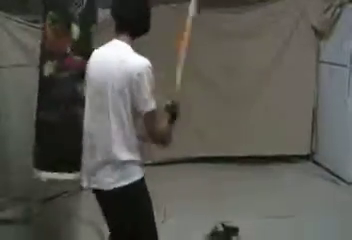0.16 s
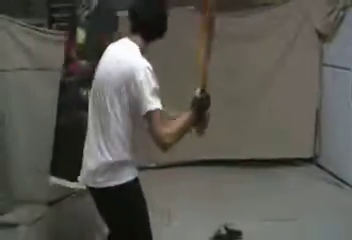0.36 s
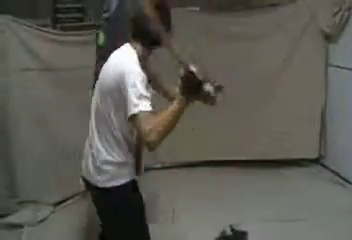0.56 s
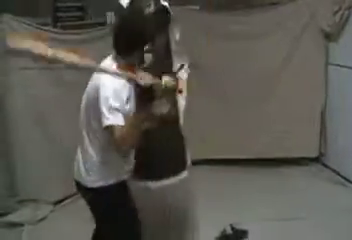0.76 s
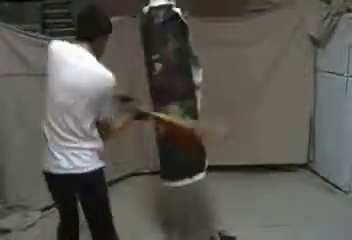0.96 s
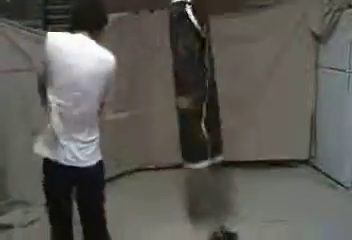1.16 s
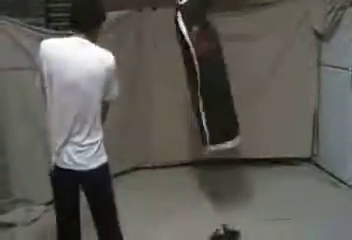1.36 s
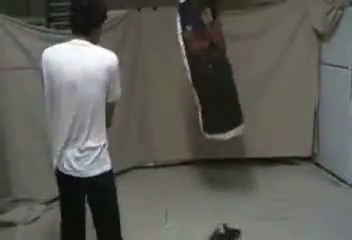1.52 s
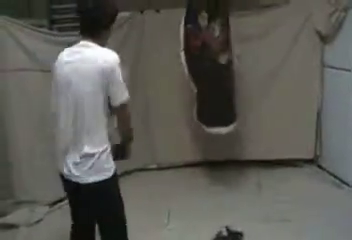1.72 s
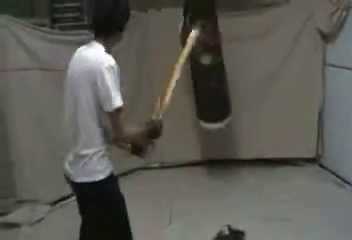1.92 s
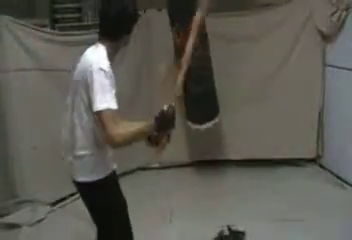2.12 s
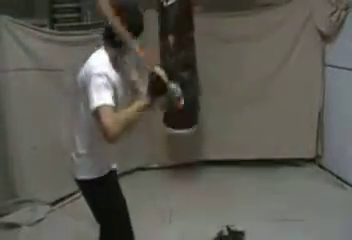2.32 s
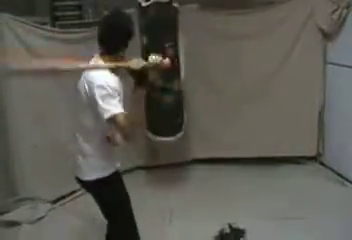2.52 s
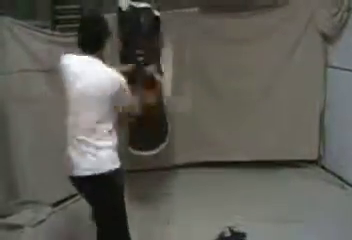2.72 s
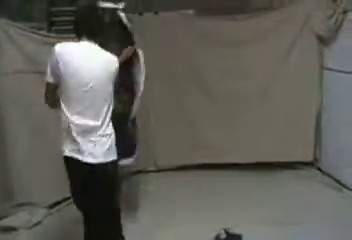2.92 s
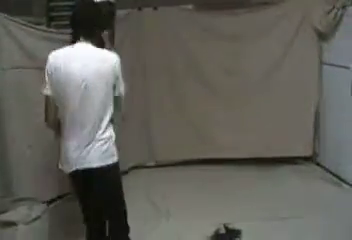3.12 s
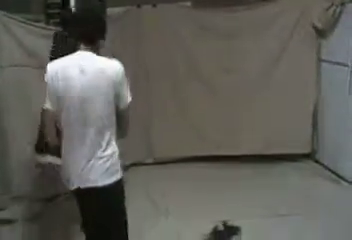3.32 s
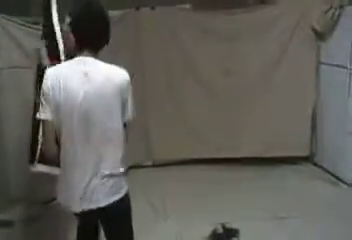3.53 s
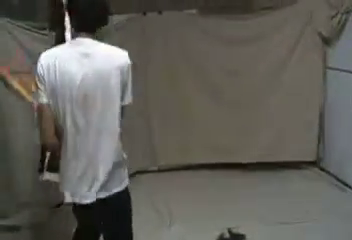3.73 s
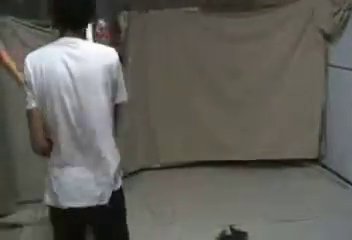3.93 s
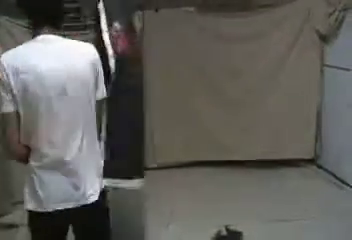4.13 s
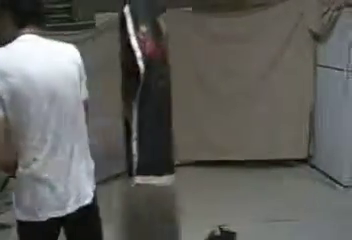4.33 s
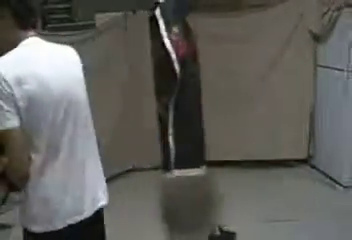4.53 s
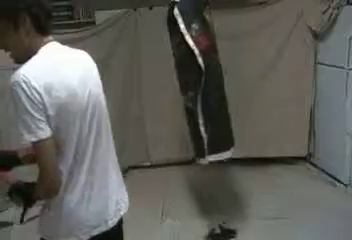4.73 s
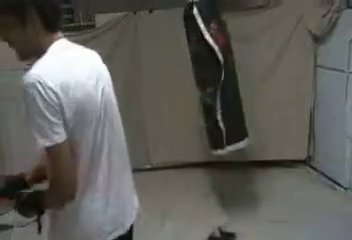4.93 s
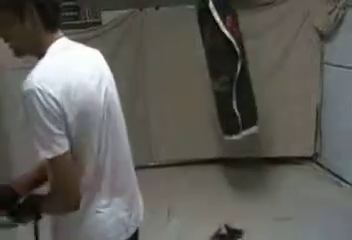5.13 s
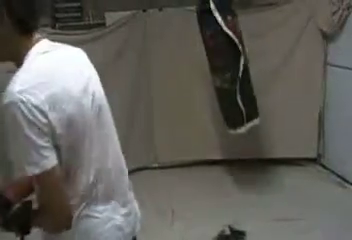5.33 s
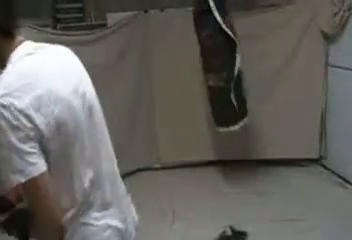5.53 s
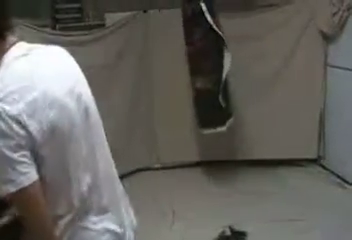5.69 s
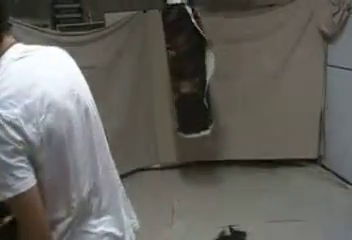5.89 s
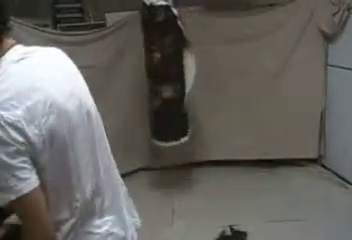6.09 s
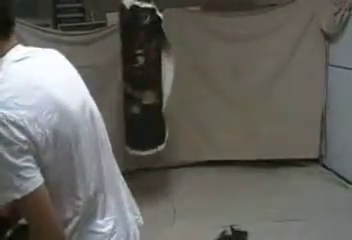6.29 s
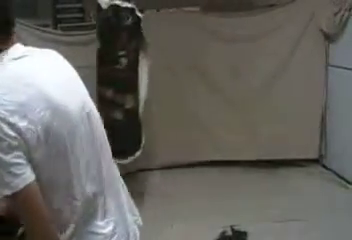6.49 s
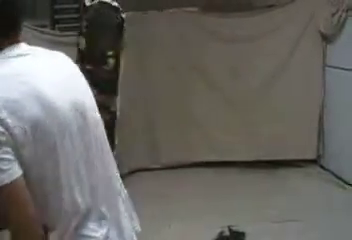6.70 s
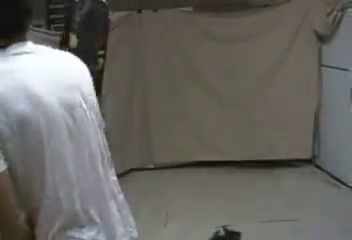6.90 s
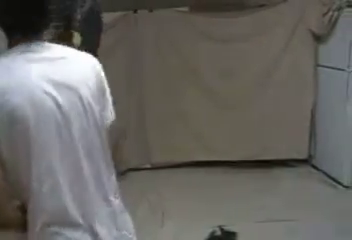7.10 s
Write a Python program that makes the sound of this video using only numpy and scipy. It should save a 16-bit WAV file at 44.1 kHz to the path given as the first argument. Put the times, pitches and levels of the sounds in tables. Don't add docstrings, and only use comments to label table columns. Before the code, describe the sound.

A small stereo microphone in a bare garage picks up a steady low motor hum near 114 Hz, soft rumble and airy hiss. It opens on the fading ring of an earlier swing, with foot taps and jolts until 0.3 s, then rustling and a faint creak. At 1.18 s a bat slams a hanging heavy bag: a very loud, clipped, slapping crack with a boomy ring, shuddering beam jolts and ducked background air. Quieter rustle and creaks follow, then a second, slightly lower whack at 2.99 s, with strong jolts around 3.2-3.4 s. Shoes scuff at about 3.6 s; a dull knock lands at 4.06 s. Small knocks cluster at 4.7-4.9 s, the hanger creaks near 5.1 s, and a hollow, woody thud with a bright click comes close by at 5.42 s. Scuffs, rustle and light taps continue from 5.9 to 6.5 s; a faint creak comes near 7 s.

```python
import sys
import numpy as np
from scipy import signal
from scipy.fft import rfft, irfft, next_fast_len
from scipy.io import wavfile
from scipy.ndimage import uniform_filter1d

SR = 44100
rng = np.random.default_rng(int(sys.argv[2]) if len(sys.argv) > 2 else 0)


def gain_from_db(level_db):
    decades = np.asarray(level_db, float) / 20
    return 10 ** decades


def master(y):
    cut = np.clip(np.atleast_2d(y).T, -1, 1)
    pcm = np.round(cut * 32767)
    wavfile.write(sys.argv[1], SR, pcm.astype(np.int16))


N = 315312
T = np.arange(N) / SR

# start in seconds, push in dB, push pitch in Hz, slap in dB,
# slap length in seconds.
BLOWS = [
    (1.1757, 15, 270, 12, .0042),
    (2.9934, 15, 205, 8, .0062),
    (5.4253, -4, 420, -24, .003),
]
# frequency in Hz, level in dB per Hz.
SLAP_COLOUR = [(500, -16), (1050, -2), (2200, 2), (3700, -1.5), (6000, -20), (10000, -7), (12000, -39)]
# dip in dB, recovery in seconds.
DUCKS = [
    (-17, 0.32),
    (-6, 0.3),
    (-7, 0.17),
]
# start in seconds, level in dB, extra dB while the cover flaps,
# flapping in seconds, pace of the fade.
SHAKES = [
    (-.05, -38.5, -2, .2, .8),
    (1.182, -21.5, 3, .17, 1.02),
    (3.002, -23.5, 5.5, .14, .86),
]
# centre in seconds, length in seconds, level in dB.
JOLTS = [(0.045, 0.078, -27.5), (.14, .12, -23), (1.29, .07, -14), (1.384, 0.07, -21), (1.52, 0.18, -17.5),
         (1.799, .1, -23), (3.208, 0.067, -14.5), (3.285, .1, -13), (3.354, 0.085, -14), (3.47, .2, -28),
         (3.64, .15, -30), (2.97, .06, -27.5)]

# frequency in Hz, level in dB per Hz.
BEAM_COLOUR = [(8.8, -26), (15, 19), (32, -2), (70, 12), (130, -8), (170, -61), (290, -120)]
# frequency in Hz, level in dB per Hz.
BODY_COLOUR = [(59, -51), (100, 0), (135, -9.5), (199, -6), (358, -15.5), (394, -14), (426, -21.5),
               (471, -15), (650, -23.5), (840, -31.5), (1430, -120)]
# frequency in Hz, level in dB per Hz.
MIDDLE_COLOUR = [(290, -32), (500, -15), (614, -6.5), (711, -2), (857, -3.5), (1360, 0), (1910, -1.5),
                 (2200, -1.5), (3090, -10.5), (3620, -10), (5200, -26), (6760, -40), (11400, -120)]
# frequency in Hz, level in dB per Hz.
LATE_COLOUR = [(350, -30), (520, -9), (800, -11), (1050, -9), (1350, -4), (1750, -6), (2300, 0), (2800, -6),
               (3450, -3), (4300, -8), (5200, -14), (6800, -34)]
# frequency in Hz, level in dB per Hz.
TREBLE_COLOUR = [(2650, -29), (4500, -4), (6260, -9.5), (9340, -9), (10900, -20.5), (14200, -68),
                 (22000, -120)]
# level in dB, extra flapping in dB, fall in dB per second,
# steepening in dB per second squared.
BEAM_RING = (6.5, -6, 0, 61)
BODY_RING = (.5, 4.5, 25, 50)
MIDDLE_RING = (.5, -.5, 3, 74)
TREBLE_RING = (-9, .1, 26, 55)
# level in dB, extra dB at contact, contact in seconds,
# hold in seconds, fall in dB per second.
BEAM_THUD = (-30, 10, .015, .12, 40)
BODY_THUD = (-14.5, 12, .021, .09, 160)
MIDDLE_THUD = (-32, 21, .008, .11, 100)
TREBLE_THUD = (-46, 9, .012, .09, 70)
# frequency in Hz, level in dB.
HOLLOW_MODES = [(140, 4), (153, -0.5), (185, -8.5), (225, -6), (262, -5.5), (285, 3.5), (310, -7.5),
                (345, -14.5), (450, -17), (530, -6), (600, -11)]

# start in seconds, peak in dB, lowest Hz, highest Hz, room level in dB.
TAPS = [(.070, -24, 350, 637, -4), (0.2049, -11, 300, 5000, -16), (.217, -17, 430, 4800, -14.5),
        (.282, -27.5, 6700, 10200, -16), (.891, -37, 200, 895, -15), (1.052, -35.5, 3000, 5500, -15),
        (1.126, -25, 600, 4500, -5), (2.9553, -39, 300, 1200, -6), (4.0598, -13, 110, 1900, -11),
        (4.7317, -23, 280, 1150, -8), (4.7682, -29, 450, 8000, -12), (4.848, -34, 3570, 5500, -19),
        (4.8779, -24, 200, 4500, -12.5), (5.2569, -19, 216, 990, -3.5), (5.4217, -10, 2200, 11200, -27),
        (5.4231, -7, 2500, 11000, -26), (5.4584, -24.5, 596, 3800, 3), (5.93, -26, 300, 920, -30),
        (6.0762, -19, 480, 2440, -14), (6.098, -32, 700, 2400, -2), (6.1422, -18.5, 400, 1170, -19),
        (6.343, -38.5, 790, 2500, 2), (6.4673, -28.5, 400, 3000, -10)]
# centre in seconds, length in seconds, level in dB, centre pitch in Hz.
SCUFFS = [(0.123, 0.12, -42, 3000), (.25, .12, -43, 350), (1.09, .07, -47, 4000),
          (1.124, 0.24, -43.5, 6000), (1.174, 0.079, -39, 900), (1.969, 0.2, -40.5, 3200),
          (2.892, 0.27, -47, 5000), (2.988, 0.11, -38.5, 514), (3.56, 0.39, -34, 820),
          (3.612, 0.093, -30.5, 4400), (3.68, 0.36, -43, 2500), (4.3, 0.34, -50, 3010),
          (4.48, 0.15, -51.5, 2500), (4.85, .05, -50, 4200), (5.308, 0.22, -45.5, 3800),
          (5.782, 0.36, -38, 3440), (6.11, .12, -62, 1500), (6.385, 0.15, -45.5, 2000)]
# centre in seconds, length in seconds, level in dB.
RUSTLES = [(.8, 1.2, -47.5), (2.016, 0.81, -46), (2.45, 0.7, -53), (2.9, 0.78, -49.5), (4.15, .6, -44),
           (5.127, 0.91, -45.5), (5.762, .7, -45), (6.198, 1.0, -50), (7.05, 0.71, -49.5)]
# frequency in Hz, level in dB per Hz.
CLOTH_COLOUR = [(300, 10), (700, 2), (1500, 2), (2600, -2.5), (5000, -17.5), (9000, -21.5)]
# centre in seconds, length in seconds, level in dB,
# pitch in Hz.
CREAKS = [(.702, .88, -54, 388), (.72, .7, -55.5, 1500), (1.635, .12, -43, 385), (1.8, .5, -52, 390),
          (2.31, .56, -56, 383), (2.302, .6, -57, 1560), (3.495, .14, -39, 400), (5.12, .44, -42.5, 383),
          (5.07, .3, -55, 1240), (5.1, .3, -52, 700), (7.02, .55, -49, 385)]

# multiple of the hum pitch, level in dB.
HUM_ORDERS = [(.5, -7), (1, 0), (2, -22)]
# pitch in Hz, level in dB.
WHINES = [(398, -68.5), (603, -66.5), (1254, -64.5), (1599, -65.5)]
# frequency in Hz, level in dB per Hz.
AIR_COLOUR = [(82, -15), (140, 4.5), (177, 3.5), (194, -7), (229, 0.5), (255, -5), (389, -5.5), (549, -10),
              (613, -8), (659, -12.5), (1550, -17), (1800, -17.5), (10900, -27.5), (14200, -97),
              (22000, -120)]
# frequency in Hz, level in dB per Hz.
RUMBLE_COLOUR = [(7.1, 15.5), (12, 12.5), (38, -1), (64, 5), (86, -7.5), (93, -12), (105, -9), (140, -46),
                 (230, -120)]
# frequency in Hz, side minus mid in dB.
WIDTH = [(30, -22), (120, -30), (250, -22), (500, -15), (1000, -11), (2000, -8), (4000, 0), (6000, -1),
         (9000, -4)]
# frequency in Hz, left minus right in dB.
LEAN = [(30, .8), (500, 1.3), (4000, 1.3), (8000, -1)]


def blows():
    out, t = np.zeros((2, N)), T[:1764]
    for s, push_db, hz, slap_db, length in BLOWS:
        mid, side = shape(rng.standard_normal((2, len(t))), SLAP_COLOUR)
        slap = spread(mid, .5 * side) / mid.std()
        slap = slap * np.exp(-(t / length) ** 4) * (1 - np.exp(-t / 0.00026))
        push = np.sin(2 * np.pi * hz * .003 * np.log(1 + t / .003)) * np.exp(-t / .004)
        squeeze = gain_from_db(push_db - 20) * np.exp((t - t[-1]) / (.2 * length))
        add(out, s - t[-1], squeeze)
        add(out, s, gain_from_db(slap_db) * slap - gain_from_db(push_db) * push)
    return out


def aftersound():
    starts = [s for s, *_ in SHAKES + BLOWS[-1:]]
    early = sum(np.exp(-np.maximum(T - s, 0) / .14) * (T > s) for s in starts).clip(0, 1)
    middle = np.sqrt(early) * noise(MIDDLE_COLOUR) + np.sqrt(1 - early) * noise(LATE_COLOUR)
    jolts = sum(gain_from_db(db) * bump(s, length) for s, length, db in JOLTS)

    body_gain = shaken(*BODY_RING) + 0.48 * thud(*BODY_THUD)
    beam_gain = shaken(*BEAM_RING) + thud(*BEAM_THUD) + jolts
    middle_gain = shaken(*MIDDLE_RING) + thud(*MIDDLE_THUD)
    treble_gain = shaken(*TREBLE_RING) + thud(*TREBLE_THUD)

    out = noise(BODY_COLOUR) * body_gain * gain_from_db(1.93 * walk(50))
    out = out + noise(BEAM_COLOUR) * beam_gain * gain_from_db(1.33 * walk(24.92))
    out = out + middle * middle_gain * gain_from_db(.9 * walk(300) + 1.1 * walk(45))
    return out + noise(TREBLE_COLOUR) * treble_gain * gain_from_db(0.53 * walk(770))


def shaken(db, flap_db, fall, steepening):
    build_db, build_s = 2, .03
    gain = 0
    for s, level_db, extra_db, length, pace in SHAKES:
        since = np.maximum(T - s, 0)
        fade_db = fall * pace * since + steepening * (pace * since) ** 2
        fade_db = fade_db + build_db * np.exp(-since / build_s)
        flapping_db = (extra_db + flap_db) * until(since, length, .012)
        gain = gain + (T > s) * gain_from_db(level_db + db + flapping_db - fade_db)
    return uniform_filter1d(gain, size=32)


def hollow():
    upper_hz, upper_damp_db_s = 400, 130
    since = T - BLOWS[-1][0] - .0027
    loose = np.clip(since / .04, 0, 1)
    modes = 0
    for hz, db in HOLLOW_MODES:
        damping_db = (hz > upper_hz) * upper_damp_db_s * np.maximum(since, 0)
        level = gain_from_db(db + 3.8 * loose * walk(30) - damping_db)
        modes = modes + level * np.cos(2 * np.pi * hz * since + 1.04 * loose * walk(35))
    return modes / modes.std() * thud(*BODY_THUD)


def thud(db, contact_db, contact, hold, fall):
    since = T - 5.425
    contact_lift = contact_db * until(since, contact, .3 * contact)
    release_db = fall * np.maximum(since - hold, 0)
    return uniform_filter1d((since > 0) * gain_from_db(db + contact_lift - release_db), size=32)


def taps():
    crunch_s, crunch_power = 0.0025, -0.41
    room_t60_s = 0.39
    out, t = np.zeros((2, N)), T[:SR // 2]
    for s, db, low_hz, high_hz, room_db in TAPS:
        centre_hz = np.sqrt(low_hz * high_hz)
        decay = crunch_s * (centre_hz / 1000) ** crunch_power
        crunch, mid, side = rng.standard_normal((3, len(t)))
        crunch = (11 * (t == 0) + crunch) * np.exp(-t / decay)
        echoes = spread(mid, side) * np.exp(-np.log(1000) * t / room_t60_s) * (1 - np.exp(-t / 0.0097))

        band = signal.butter(3, [low_hz, min(high_hz, 11000)], "band", fs=SR, output="sos")
        body = np.vstack([band, signal.butter(1, centre_hz, fs=SR, output="sos")])
        crunch, echoes = signal.sosfilt(body, crunch), signal.sosfilt(body, echoes)
        contact = crunch / np.abs(crunch).max()
        room = gain_from_db(room_db - 13.0) * echoes / echoes[0, :4410].std()
        add(out, s, gain_from_db(db) * (contact + room))
    return out


def scuffs():
    out = noise(CLOTH_COLOUR) * sum(gain_from_db(db) * bump(s, length) for s, length, db in RUSTLES)
    for s, length, db, hz in SCUFFS:
        colour = [(.03 * hz, -40), (0.062 * hz, -6), (hz, -3), (3 * hz, -14), (8 * hz, -30)]
        out = out + gain_from_db(db) * bump(s, length) * noise(colour)
    return out * gain_from_db(1.4 * walk(220))


def creaks():
    out = 0
    for s, length, db, hz in CREAKS:
        resonance = [(.6 * hz, -40), (.85 * hz, -12), (hz, 0), (1.17 * hz, -12), (1.6 * hz, -40)]
        out = out + gain_from_db(db) * np.minimum(1.6 * bump(s, length), 1) * noise(resonance)
    return out


def motor():
    hum_hz, hum_db, air_db = 113.9, -35.5, -45.5
    rest_db, stirred_db, settle_db_s = -32, -22.5, 9.5
    turn = 2 * np.pi * np.cumsum(hum_hz + .3 * walk(5)) / SR
    hum = sum(gain_from_db(hum_db + db + 1.2 * walk(6)) * np.sin(order * turn) for order, db in HUM_ORDERS)
    whine = 0
    for hz, db in WHINES:
        phase = 2 * np.pi * np.cumsum(hz + 2.58 * walk(19)) / SR
        whine = whine + gain_from_db(db + 1.5 * walk(6)) * np.sin(phase)

    stirred = sum((T > s) * gain_from_db(stirred_db - settle_db_s * (T - s)) for s, *_ in SHAKES)
    rumble = noise(RUMBLE_COLOUR) * np.hypot(gain_from_db(rest_db + 2.1 * walk(3.1)), stirred)
    air = noise(AIR_COLOUR) * gain_from_db(air_db + .5 * walk(2.95))
    return np.sqrt(2) * hum + rumble, np.sqrt(2) * whine + air


def shape(x, table, share=1):
    hz, db = np.transpose(table)
    at = np.log(np.maximum(np.fft.rfftfreq(x.shape[-1], 1 / SR), 1))
    return irfft(rfft(x) * gain_from_db(share * np.interp(at, np.log(hz), db)), x.shape[-1])


def spread(mid, side):
    side = shape(side, WIDTH)
    return np.array([mid + side, mid - side])


def noise(table):
    pair = shape(rng.standard_normal((2, next_fast_len(N))), table)
    return spread(*pair)[:, :N] / pair[0].std()


def walk(rate):
    k = int(SR / rate)
    steps = np.repeat(rng.standard_normal(N // k + 1), k)
    return 1.188 * uniform_filter1d(uniform_filter1d(steps, k), k)[:N]


def bump(s, length):
    return np.exp(-.5 * ((T - s) / (0.2 * length)) ** 2)


def until(since, length, edge):
    return .5 - .5 * np.tanh((since - length) / edge)


def add(out, s, x):
    i = int(s * SR)
    out[..., i:i + x.shape[-1]] += x[..., :N - i]


def scene():
    dip_db = 0
    for (s, *_), (db, recovery) in zip(BLOWS, DUCKS):
        dip_db = dip_db + db * np.exp(-(np.maximum(T - s, 0) / recovery) ** 2) * (T > s)
    low, air = motor()
    return blows() + hollow() + aftersound() + taps() + scuffs() + creaks() + low + air * gain_from_db(dip_db)


def band_limit(x):
    return signal.sosfilt(signal.butter(12, 11070, fs=SR, output="sos"), x)


def record(dry):
    lean = np.array([shape(dry[0], LEAN, .5), shape(dry[1], LEAN, -.5)])
    overloaded = np.clip(lean, -1.08, 1.08)
    cut = signal.sosfilt(signal.ellip(10, .2, 80, 11050, fs=SR, output="sos"), overloaded)
    full = shape(np.clip(cut, -1, 1), [(15500, 0), (16200, -14)])
    return band_limit(np.clip(full, -1, 1))


dry = scene()
out = record(dry)
master(out)
```